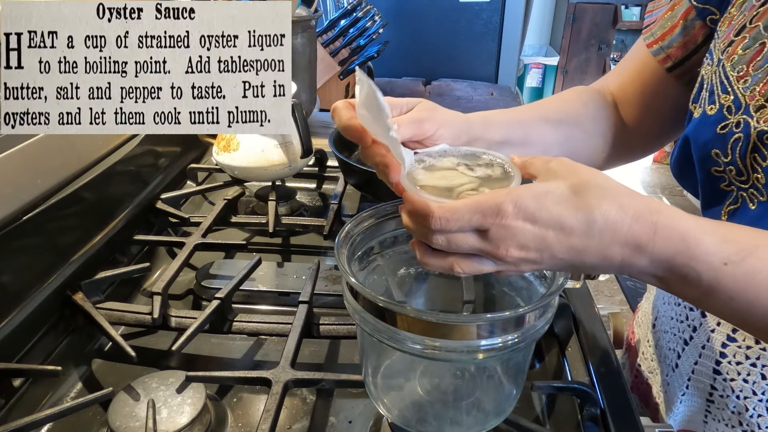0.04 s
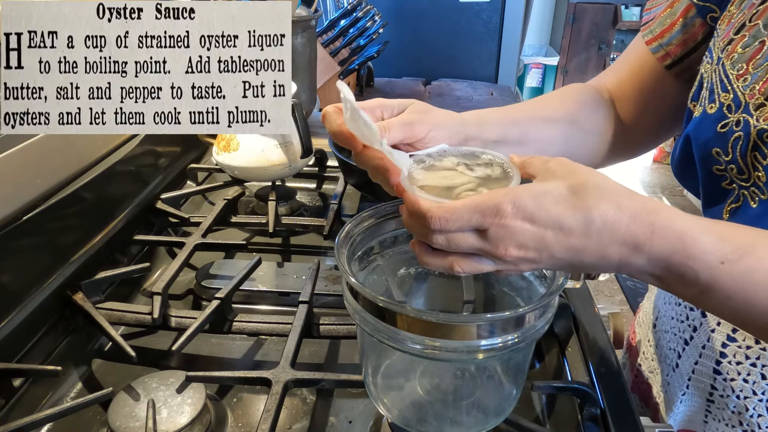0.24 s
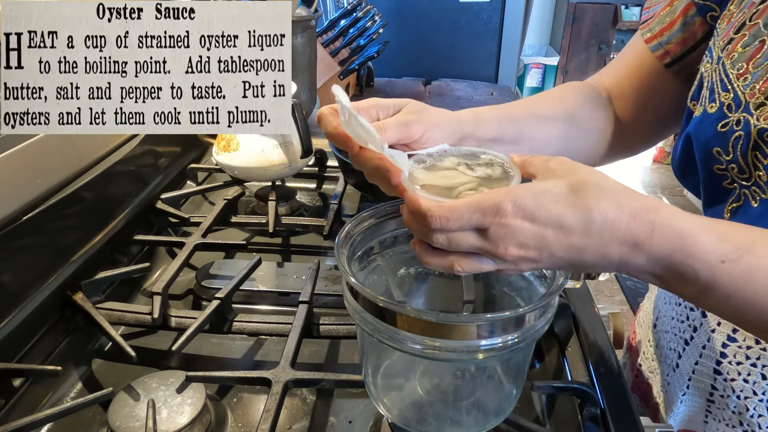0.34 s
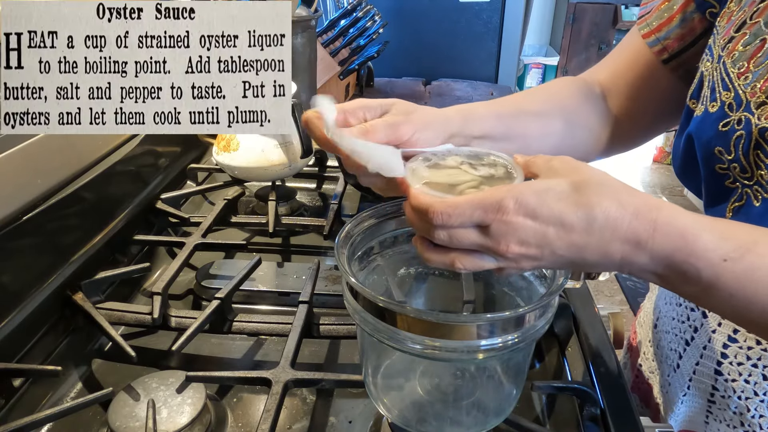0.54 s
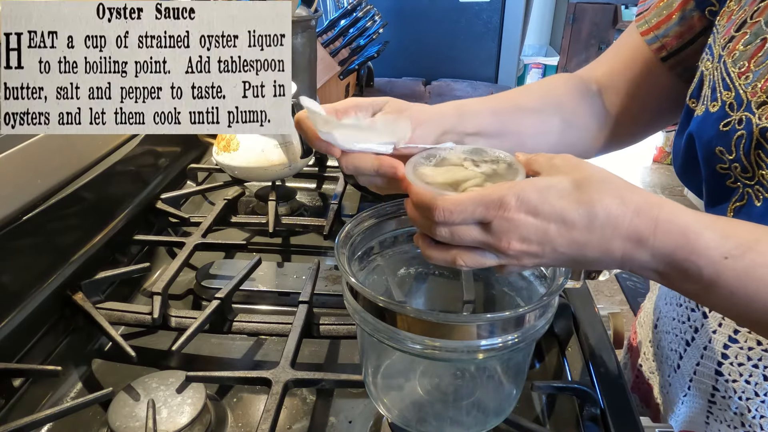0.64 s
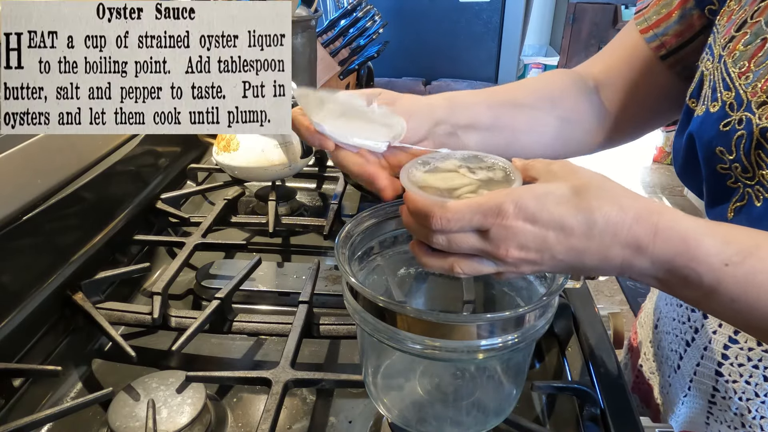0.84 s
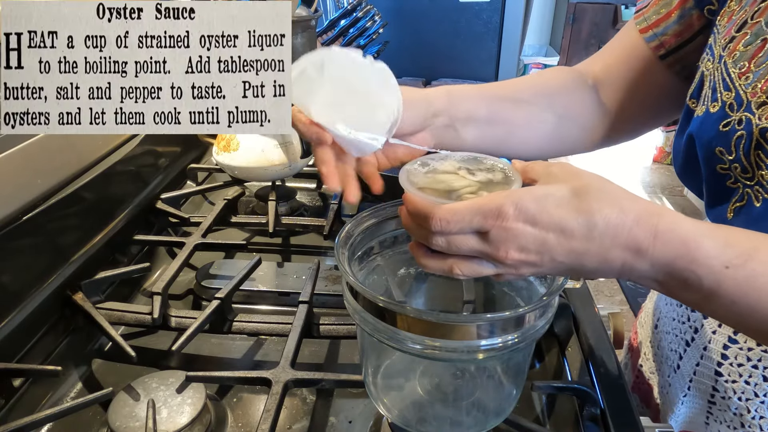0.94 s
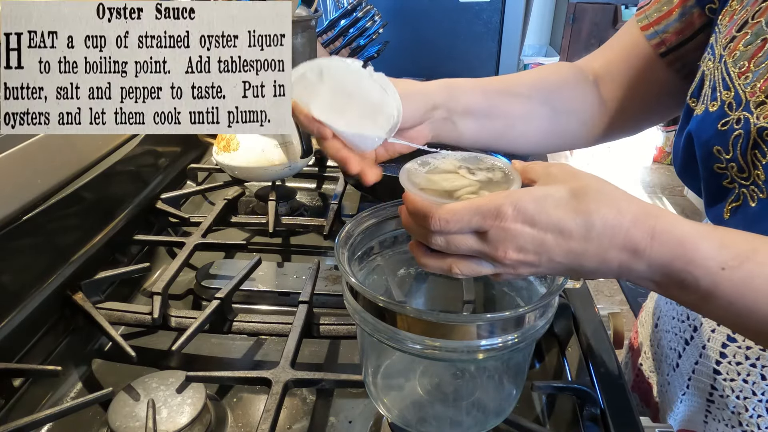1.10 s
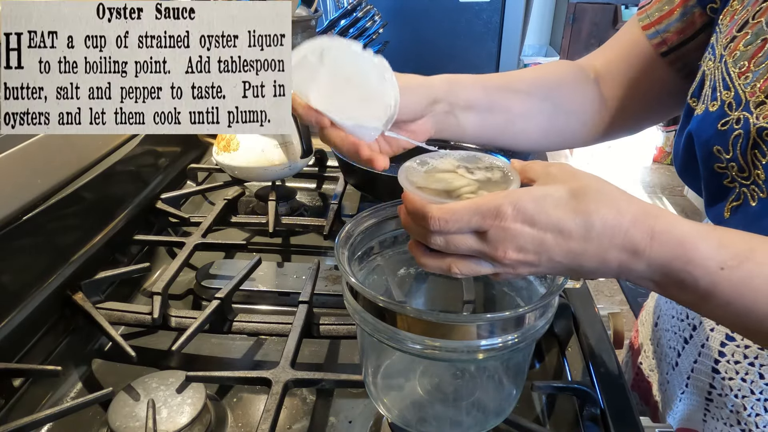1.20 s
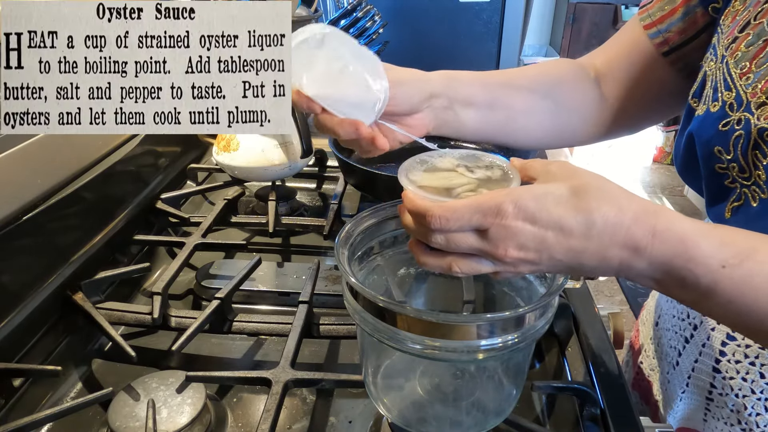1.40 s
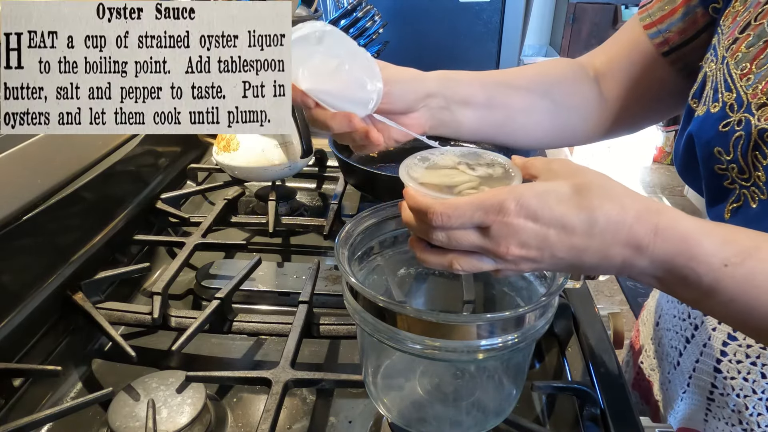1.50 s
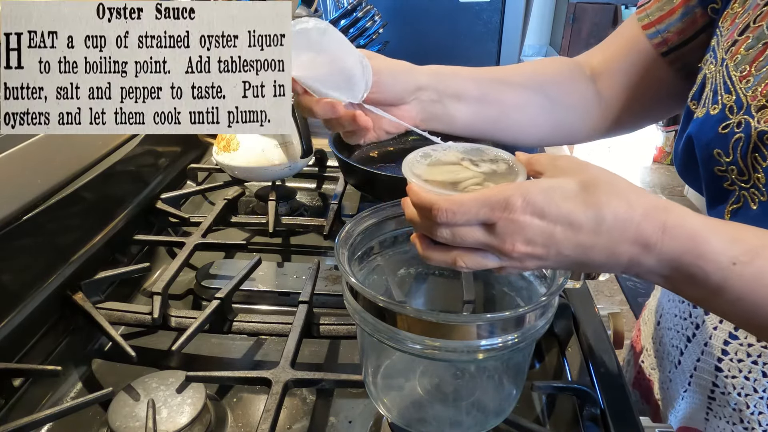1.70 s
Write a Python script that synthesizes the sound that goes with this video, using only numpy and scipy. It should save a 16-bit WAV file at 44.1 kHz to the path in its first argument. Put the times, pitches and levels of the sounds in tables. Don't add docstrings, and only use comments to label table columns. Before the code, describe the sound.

A thin plastic lid is pried off a full tub with sharp scattered snaps, pops loose with a loud click and hollow knock, then a strip ticks and creaks; close stereo microphone, quiet kitchen, faint fridge hum.

```python
import sys
import numpy as np
from scipy import signal
from scipy.fft import rfft, irfft, next_fast_len
from scipy.io import wavfile
from scipy.ndimage import map_coordinates

SR = 44100
rng = np.random.default_rng(int(sys.argv[2]) if len(sys.argv) > 2 else 0)


def volts_from_db(level):
    exponent = np.asarray(level, float) / 20
    return 10 ** exponent


def put_to_file(sound):
    columns = np.atleast_2d(sound).T
    safe = np.clip(columns, -1, 1)
    whole_steps = np.round(safe * 32767)
    wavfile.write(sys.argv[1], SR, whole_steps.astype(np.int16))


N = 77175


def unit(x):
    return x / np.sqrt(np.mean(x ** 2) + 1e-20)


def along(points, hz):
    f, v = np.transpose(points)
    return np.interp(np.log(hz + 1), np.log(f + 1), v)


def curve(rows):
    return np.interp(np.arange(N) / SR, *np.transpose(rows))


def wobble(rate):
    knots = rng.standard_normal(int(N * rate / SR) + 4)
    return map_coordinates(knots, [np.arange(N) * rate / SR])


def filtered(x, response):
    n = x.shape[-1]
    m = next_fast_len(n + 4096)
    return irfft(rfft(x, m) * response(np.fft.rfftfreq(m, 1 / SR)), m)[..., :n]


def resonance(f, hz, width):
    return 1j * f * width / (hz * hz - f * f + 1j * f * width)


def shaped(noise, envelope):
    x = noise * envelope
    return x * np.linalg.norm(envelope) / np.linalg.norm(x)


# start_s, level_db, pitch_hz of the panel, treble_db, tub_knock_db
RIM_SNAPS = [(0.0004, -46.5, 4150, -2, -27), (0.0064, -32, 6500, -5, -60), (0.0278, -30.5, 6360, -5.5, -37),
             (0.0603, -41, 5730, -5, -25), (0.069, -42.5, 3700, -4, -37), (0.1457, -53, 6050, -2.5, -42),
             (.1506, -47, 5100, 0, -45), (0.1698, -48, 6350, -12, -35), (0.187, -43.5, 2700, -8, -46),
             (0.1974, -34.5, 5170, -11, -34), (0.2045, -29, 4600, -10, -61), (0.2201, -24, 6070, -11, -64),
             (0.3351, -27.5, 4770, -9, -44), (0.372, -22.5, 5360, -11.5, -20),
             (0.4124, -49.5, 5600, 5.5, -33), (0.4477, -35.5, 4050, -8, -45), (0.4648, -22, 6930, -40, -37),
             (0.5232, -39, 3910, -7, -50.5), (0.5303, -38, 6120, -17, -33.5),
             (0.5755, -36, 3280, -7.5, -39), (0.613, -42, 3040, -2, -34), (0.6246, -35.5, 3220, -15, -28),
             (0.6338, -52, 2660, -10.5, -26.5), (1.7478, -45.5, 1095, -10, -10)]
# start_s, level_db, pitch_hz of the panel, treble_db, tub_knock_db
POP_SNAPS = [
    (0.6521, -22, 2880, -13, -37),
    (0.6517, -22, 5800, -8, -50),
    (0.6675, -17.5, 2930, -14, -19.5),
    (.6734, -27.5, 2480, -15, -21),
    (0.7047, -11, 5630, -11.5, -24),
    (0.7076, -15, 2790, -29.5, -9.5),
    (.7134, -19, 5300, -9, -15.5),
    (0.7227, -23.5, 2400, -11.5, -24),
]


def lid():
    part = dict(db=-8.5, after_db=-8.5, rim_db=0.5, burst_s=0.0023, after_t60=0.047, rise_s=0.0006, ring_db=3)
    return contacts(part, [*RIM_SNAPS, *POP_SNAPS])


# start_s, level_db,
# pitch_hz of the panel, treble_db
SWING_TICKS = [(0.8844, -52.5, 5330, -10.5), (0.916, -55.5, 3130, -8), (0.9298, -50.5, 7200, 3.5),
               (0.9555, -51, 5960, -5), (0.961, -49, 3420, -21), (0.9887, -44.5, 6140, -8.5),
               (1.0358, -49, 5980, -11), (1.0708, -36, 2970, -25), (1.079, -42, 4830, -25),
               (1.0875, -43, 5150, -27), (1.1096, -45.5, 5130, -27), (1.1463, -59, 4800, -25),
               (1.1754, -57.5, 4830, -32), (1.2181, -43, 4940, -25), (1.25, -69, 9000, 2),
               (1.3093, -60, 5330, -33), (1.3404, -54.5, 5600, -10), (1.3557, -49.5, 2980, -24.5),
               (0.9322, -46, 7400, -9.5), (0.988, -45, 3080, -20), (1.0435, -56, 6460, -11.5),
               (1.05, -53.5, 5800, -6.5), (1.0645, -51, 3140, -25), (1.0692, -39, 6340, -28),
               (1.0856, -41, 2860, -24), (1.3185, -60, 5500, -22), (1.5398, -50, 2800, -25)]
# start_s, level_db, pitch_hz of the panel, treble_db, rim_db (broad colour)
STRETCH_TICKS = [(1.3673, -34, 2900, -17, -1), (1.4087, -50, 5800, -20, -22), (1.4237, -52, 5150, -6, -2),
                 (1.4422, -43.5, 3100, -14, 9.5), (1.4571, -36, 2730, -13, -8), (1.479, -44.5, 5400, -2, 3),
                 (1.4845, -42, 5520, -13, 8), (1.5038, -32.5, 2820, -24, -4.5),
                 (1.51, -36.5, 2870, -14, -5), (1.5504, -35, 1800, -27, -8),
                 (1.5522, -31.5, 3000, -27, -12), (1.5627, -33, 2840, -23, -8),
                 (1.5715, -35, 3070, -5.5, 3.5), (1.5774, -51, 3620, -24, -6), (1.6058, -47, 3050, -23, -6),
                 (1.6148, -52, 2640, -20, -11), (1.6314, -34.5, 2850, -28, -9),
                 (1.6507, -29.5, 2700, -28, -1.5), (1.6644, -27, 2690, -15, -12),
                 (1.671, -42, 2900, -27, 1), (1.681, -30.5, 2780, -22.5, -3.5),
                 (1.6914, -53, 2900, -18, -4), (1.7085, -50, 3000, -12, -12), (1.723, -35.5, 1780, -11, -6),
                 (1.7444, -39, 1800, -25, -6)]


def strip():
    part = dict(db=-6, after_db=-10.5, burst_s=0.0015, after_t60=0.059, rise_s=0.00046, ring_db=3.5)
    swing_rim_db, tub_knock_db, low_hz = -6.5, -63, 1296
    rows = [*[(*row, swing_rim_db) for row in SWING_TICKS], *STRETCH_TICKS]
    ticks = contacts(part, [(*row, tub_knock_db, rim_db) for *row, rim_db in rows])
    return filtered(ticks, lambda f: (1j * f / (low_hz + 1j * f)) ** 2)


def contacts(part, rows):
    out = np.zeros(N + SR)
    names = ["hz", "treble_db", "knock_db", "rim_db"]
    for start_s, level_db, *colour in rows:
        sound = snap(**dict(zip(names, colour)), **part)
        out[round(start_s * SR):][:len(sound)] += volts_from_db(level_db) * sound
    return out[:N]


# pitch_hz, level_db
RIM_COLOUR = [(450, -43), (800, -17.5), (1500, -3), (2710, -2), (3900, -3), (5530, -0.5), (9000, -12),
              (11700, -24), (19800, -120)]
# pitch_hz, level_db
TREBLE_COLOUR = [(4410, -13.5), (7500, -3), (9140, -10), (11700, -8.5), (15500, -25)]


def snap(hz, treble_db, knock_db, rim_db, db, after_db, burst_s, after_t60, rise_s, ring_db):
    t = np.arange(SR // 4) / SR
    rise = 1 - np.exp(-t / rise_s)
    burst = rise * np.exp(-(t / burst_s) ** 2)
    uneven_db = 3 * np.interp(t, t[::88], rng.standard_normal(len(t[::88])))
    after = (1 - np.exp(-t / burst_s)) * volts_from_db(after_db + uneven_db - 60 * t / after_t60)

    def burst_and_rattle(noise, more_db):
        return shaped(noise, burst) + volts_from_db(more_db) * after * noise

    a, b, c = rng.standard_normal((3, len(t)))
    rim = unit(filtered(a, lambda f: volts_from_db(along(RIM_COLOUR, f))))
    panel = unit(filtered(b, lambda f: resonance(f, hz, 0.27 * hz) ** 2))
    treble = unit(filtered(c, lambda f: volts_from_db(along(TREBLE_COLOUR, f))))
    ring = volts_from_db(ring_db - 60 * t / 0.007) * rise * np.sin(2 * np.pi * hz * t)
    crack = ring + burst_and_rattle(panel, 0)
    crack += volts_from_db(rim_db) * burst_and_rattle(rim, 0)
    crack += volts_from_db(max(treble_db, -22) + 6) * burst_and_rattle(treble, 3)
    return volts_from_db(db) * (crack + volts_from_db(knock_db + 9) * tub_knock(t))


# pitch_hz, level_db, t60_s (time to fade by 60 dB)
TUB_TONES = [(110, -8, .06), (240, -10, .06), (693, -3, .03), (960, -16, .08), (1236, -7, .035),
             (1556, -13, .1), (1650, -4, .022), (2095, -11, .04)]
# pitch_hz, level_db, t60_s
AIR_TONES = [(530, 5, .028), (541, -17, .3)]


def tub_knock(t):
    tones = 0
    for hz, level_db, t60_s in [*TUB_TONES, *AIR_TONES]:
        fade = volts_from_db(level_db + rng.normal(0, 1) - 60 * t / t60_s)
        tones = tones + fade * np.sin(2 * np.pi * hz * t)
    return tones * (1 - np.exp(-t / 0.0007))


# start_s, level_db
HAND_EFFORT = [(0, -43), (.05, -50.5), (.1, -90), (.3, -60), (.42, -73), (.63, -53), (.85, -59.5),
               (1.04, -73.5), (1.2, -88), (1.4, -66.5), (1.6, -62.5), (1.75, -49)]


def lid_rustle():
    return creases(HAND_EFFORT, centre_hz=4620, spread=0.4, cycles=2.5)


# start_s, level_db
STRIP_CREAK = [(1.3, -91), (1.4, -87), (1.47, -57), (1.54, -55), (1.6, -70), (1.66, -51), (1.7, -71),
               (1.75, -62)]


def strip_creak():
    return creases(STRIP_CREAK, centre_hz=2800, spread=0.1, cycles=1.5)


def creases(effort, centre_hz, spread, cycles):
    count = int(1500 * N / SR)
    when, pitch, size = rng.random((3, count))
    hz = centre_hz * np.exp(spread * 2 * (2 * pitch - 1))[:, None]
    k = np.arange(200)
    loudness = volts_from_db(-3.5 * np.log(size + 1 / 50))[:, None]
    envelope = (1 - np.exp(-k * hz / SR)) * np.exp(-k * hz / SR / cycles)
    grains = loudness * envelope * np.sin(2 * np.pi * hz * k / SR)
    places = (when * N).astype(int)[:, None] + k
    out = np.bincount(places.ravel(), grains.ravel(), N + len(k))[:N]
    return unit(out) * volts_from_db(curve(effort) - 7.5)


def scrape():
    hz, width_hz, level_db, end_s, t60_s = 1486, 370, -61, 0.066, 0.095
    fade_db = -60 * np.clip(np.arange(N) / SR - end_s, 0, None) / t60_s
    noise = unit(filtered(rng.standard_normal(N), lambda f: resonance(f, hz, width_hz) ** 2))
    return noise * volts_from_db(level_db + 4 * wobble(99) + fade_db)


# pitch_hz, t60_s
ROOM_FADE = [(300, 0.093), (1000, 0.3), (3000, 0.2), (7000, 0.17), (14000, 0.16)]
# pitch_hz, likeness (0 to 1)
ROOM_LIKENESS = [(500, 0.77), (2000, 0.28), (12000, .05)]


def kitchen(x):
    out, step, delay_s = np.zeros((2, N + SR)), 2048, 0.004
    for start in range(0, N, step):
        hz, t, z = signal.stft(rng.standard_normal((2, SR // 2)), SR, nperseg=256)
        likeness = np.clip(along(ROOM_LIKENESS, hz), 0, 1)
        share = np.sqrt(1 + likeness * [[1], [-1]])[..., None]
        fade = volts_from_db(-60 * t / along(ROOM_FADE, hz)[:, None])
        mid, side = signal.istft(z * share * fade, SR, nperseg=256)[1]
        tail = np.array([mid + side, mid - side]) / np.hypot(np.linalg.norm(mid), np.linalg.norm(side))
        wet = signal.fftconvolve(x[None, start:start + step], tail, axes=1)
        out[:, start + round(delay_s * SR):][:, :wet.shape[1]] += wet
    return out[:, :N]


# pitch_hz, level_db
HUM_TONES = [(120, -75.5), (240, -62)]


def fridge():
    t = np.arange(N) / SR
    hum = 0
    for hz, level_db in HUM_TONES:
        level = volts_from_db(level_db + 0.5 * wobble(15)) * np.sqrt(2)
        hum = hum + level * np.sin(2 * np.pi * hz * t + 0.13 * wobble(15))
    return hum * volts_from_db([[-0.2], [0.2]])


# pitch_hz, level_db
RUMBLE_COLOUR = [(8.8, -12.5), (15, -7), (38, 1.5), (59, -3.5), (86, -9), (207, -21), (244, -12),
                 (266, -16), (500, -38.5), (650, -67.5), (1100, -120)]
# start_s, level_db
RUMBLE_SWELLS = [(0.0, -58), (0.048, -48), (0.174, -57), (0.218, -49), (0.432, -45.5), (0.482, -49),
                 (0.526, -42), (0.632, -59.5), (0.866, -44), (0.97, -52), (1.11, -44.5), (1.296, -60.5),
                 (1.324, -49.5), (1.418, -57), (1.612, -50), (1.656, -60), (1.714, -46), (1.75, -48)]


def house():
    t = np.arange(N) / SR
    sway = np.sqrt(2) * volts_from_db(-49.5 + wobble(11.5)) * np.sin(2 * np.pi * 29.4 * t + 1.32 * wobble(7))
    rumble = filtered(rush(RUMBLE_COLOUR), lambda f: f ** 2 / (f ** 2 + 45 ** 2))
    deep = filtered(rumble, lambda f: 1 / (1 + (f / 130) ** 4))
    swell = volts_from_db(curve(RUMBLE_SWELLS) + 49)
    return swell * (sway + volts_from_db(-49) * deep) + volts_from_db(-50.5) * (rumble - deep)


# pitch_hz, level_db
HISS_COLOUR = [(210, -26), (350, 0), (761, -18.5), (824, -15), (1130, -12), (3120, -35), (6790, -24.5),
               (15500, -43.5)]


def hiss():
    return volts_from_db(-69) * rush(HISS_COLOUR)


# pitch_hz, likeness (0 to 1)
BACKGROUND_LIKENESS = [(60, 0.98), (180, 0.71), (550, 0.073), (1650, 0.35), (4970, 0.69), (15000, 0.45)]


def rush(spectrum):
    def response(hz):
        turn = np.arccos(np.clip(along(BACKGROUND_LIKENESS, hz), 0, 1)) / 2
        return volts_from_db(along(spectrum, hz)) * [np.cos(turn), np.sin(turn)]

    mid, side = filtered(rng.standard_normal((2, N)), response)
    return unit(np.array([mid + side, mid - side]))


# pitch_hz, level_db (half of left minus right)
DIRECT_LEAN = [(1000, 0.5), (4000, 1), (8000, 1), (14000, 3)]


def scene():
    near = lid() + lid_rustle() + scrape()
    thin = strip() + strip_creak()
    front = near + thin * volts_from_db([[-0.7], [0.7]])
    direct = filtered(front, lambda f: volts_from_db(along(DIRECT_LEAN, f) * np.array([[1], [-1]])))
    wet = kitchen(near + volts_from_db(-2.5) * thin)
    wet = filtered(wet, lambda f: volts_from_db(-2 * np.log2(1 + f / 4000)))
    return direct + volts_from_db(-3) * wet + fridge() + house() + hiss()


def top_cut(x):
    return signal.sosfilt(signal.butter(12, 15710, fs=SR, output="sos"), x)


def record(dry):
    top_hz, left_lag_s = 15450, 1 / 60000

    def ports(f):
        lag = np.exp(-2j * np.pi * f * left_lag_s * np.array([[1], [0]]))
        return lag * (f < top_hz) / (1 + (f / top_hz) ** 30)

    return top_cut(filtered(dry, ports))


dry = scene()
out = record(dry)
put_to_file(out)
```